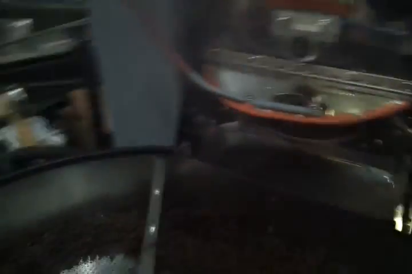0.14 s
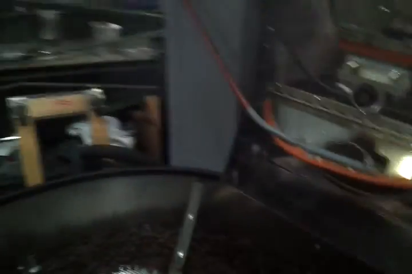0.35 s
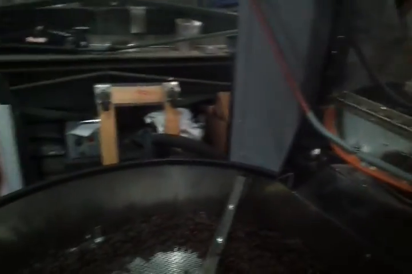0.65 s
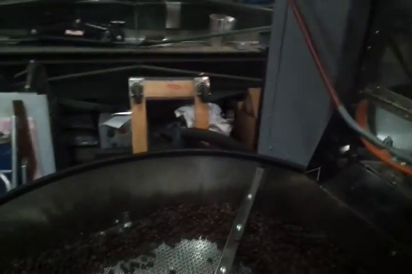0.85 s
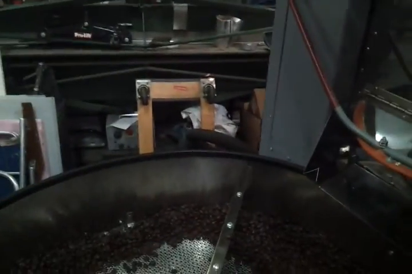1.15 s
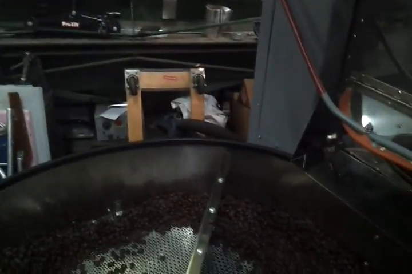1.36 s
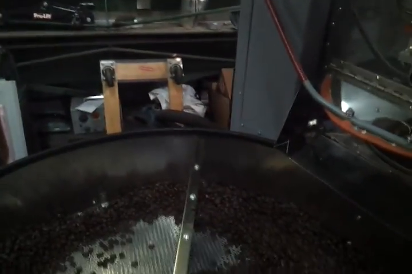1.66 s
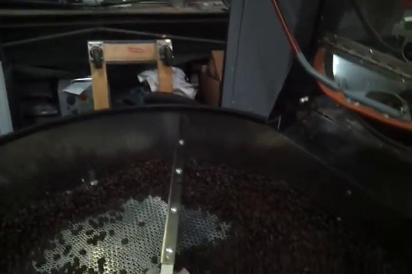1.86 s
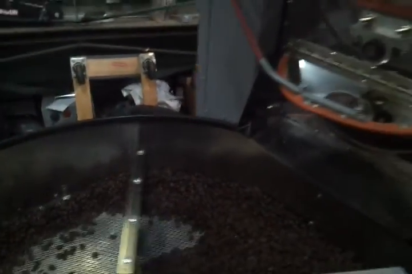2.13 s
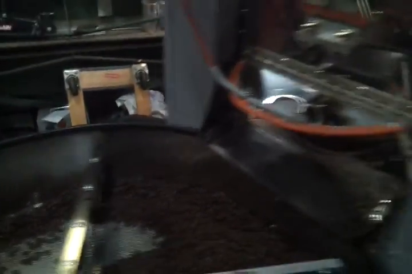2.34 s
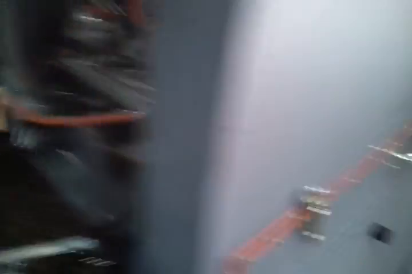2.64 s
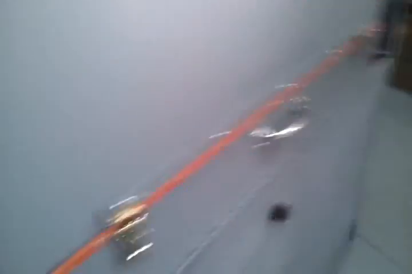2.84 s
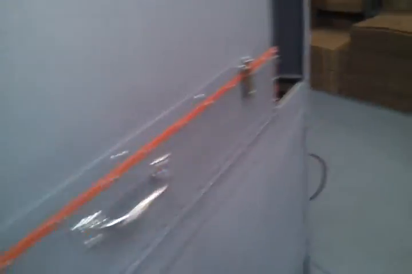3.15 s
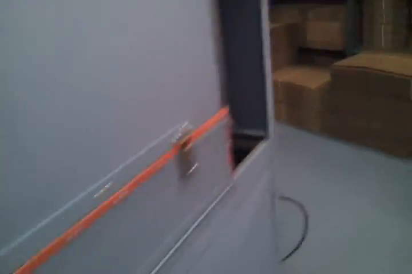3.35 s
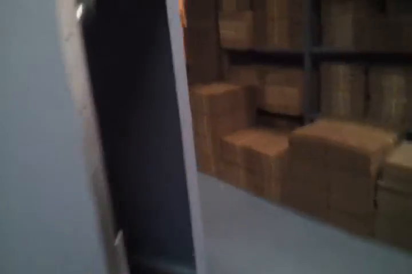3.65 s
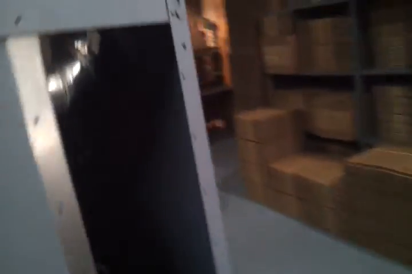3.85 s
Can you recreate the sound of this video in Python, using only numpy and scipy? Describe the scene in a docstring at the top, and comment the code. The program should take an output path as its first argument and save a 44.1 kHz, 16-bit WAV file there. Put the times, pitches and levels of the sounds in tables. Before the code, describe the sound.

Steady fan noise and motor hum, broken once by a sharp clack of metal.

```python
"""Workshop: a coffee roaster's cooling fan runs, with rushing air, a blade tone and motor hum.
Stirred beans swish faintly in the cooling tray. A metal part knocks lightly, then shuts with
one sharp clack that rings the panel; small handling taps come and go.
Near the end the microphone moves behind the cabinet, which shades the treble."""
import sys
import numpy as np
from scipy import signal
from scipy.fft import rfft, irfft
from scipy.io import wavfile
from scipy.ndimage import uniform_filter1d

SR = 44100
rng = np.random.default_rng(int(sys.argv[2]) if len(sys.argv) > 2 else 0)


def generate_wav(signal):
    """Clip the signal to [-1, 1] and save it as 16-bit WAV at the path in sys.argv[1]."""
    frames = np.transpose(np.atleast_2d(signal))
    scaled = np.clip(frames, -1, 1) * 32767
    pcm = np.round(scaled).astype(np.int16)
    wavfile.write(sys.argv[1], SR, pcm)


N = 176400
T = np.arange(N) / SR
HZ = np.fft.rfftfreq(N, 1 / SR)
TONE_FLUTTER_DB = 0.7

# microphone's path round the cabinet: t/s, air gain/dB, shade/0-1
MIC_PATH = [(0, 2, 0.09), (.6, -1, 0), (.95, -0.5, 0.01), (1.3, 3.2, 0.25), (1.75, 1.5, 0.17),
            (2.3, 1, 0.2), (2.6, -0.4, 0.1), (2.85, -1, 0.07), (3.05, -3.5, 0.24), (3.3, -3, 0.54),
            (3.55, -2.5, 0.74), (3.72, 0, 0.99), (4, -2.5, 0.95)]


def amp(db):
    """dB to gain."""
    return 10 ** (np.asarray(db) / 20)


def unit(x):
    """Scale to rms 1."""
    return x / np.sqrt(np.mean(x ** 2) + 1e-20)


def spectrum(points, hz):
    """Interpolate (f, value) rows over log frequency."""
    f, value = np.transpose(points)
    return np.interp(np.log(hz + 1), np.log(f), value)


def curves(rows, t):
    """Interpolate each column of a time table."""
    times, *columns = np.transpose(rows)
    return [np.interp(t, times, column) for column in columns]


def bell(hz, centre_hz, sigma_oct):
    """Gaussian band over log frequency, peak 1."""
    return np.exp(-(np.log2((hz + 1) / centre_hz) / sigma_oct) ** 2 / 2)


def noise(gain):
    """Noise shaped by a gain per bin, rms 1."""
    return unit(irfft(rfft(rng.standard_normal(N)) * gain, N))


def drift(rate_hz):
    """Slow random motion, rms 1."""
    return noise(np.exp(-(HZ / rate_hz) ** 2))


def decay(start_s, t60_s, rise_s=0.00097):
    """Quick attack, exponential release."""
    age = np.maximum(T - start_s, 0)
    return (1 - np.exp(-age / rise_s)) * np.exp(-np.log(1000) * age / t60_s)


def reflection_comb(hz, t, depth_db=2.5, width_hz=14, hold_s=0.18, corner_hz=370):
    """Random ripple in dB: reflections comb the air, shifting as the microphone moves."""
    delay_s = np.fft.fftfreq(len(hz), hz[1])[:, None]
    rate_hz = np.fft.fftfreq(len(t), t[1])
    smoothing = np.exp(-(delay_s * width_hz) ** 2 - (2 * rate_hz * hold_s) ** 2)
    ripple = np.fft.ifft2(np.fft.fft2(rng.standard_normal(smoothing.shape)) * smoothing).real
    return depth_db * unit(ripple) * (hz / (hz + corner_hz))[:, None]


def air(level_db=-33, flicker_db=0.68, patch_db=0.32):
    """Turbulent air through the duct's resonances, dulled behind the cabinet."""
    # rush beside the tray: f/Hz, relative density/dB
    rush_spectrum = [(25, -51), (60, -37.5), (95, -29), (140, -23.5), (190, -16.5), (320, -13),
                     (450, -14.5), (600, -10.5), (800, -12), (1200, -13), (1700, -11), (2500, -14),
                     (3300, -14.5), (5600, -14), (6400, -18.5), (7200, -26.5), (7600, -35), (7900, -59),
                     (8700, -44)]
    # duct and tray resonances: f/Hz, width/Hz, gain/dB
    resonances = [(320, 96, 2.5), (460, 100, -3), (548, 40, 5), (659, 70, -5.5), (861, 7.3, 7.5),
                  (1130, 98, 1), (1370, 85, 3.5), (1900, 580, 2.5), (2286, 150, -3), (3660, 340, -2),
                  (4370, 300, 2)]
    # cabinet's full shade: f/Hz, gain/dB
    full_shade = [(60, -2), (150, 1.5), (300, -6), (550, -10.5), (850, -7.5), (1400, -15), (2000, -15),
                  (2800, -11.5), (3800, -17), (5500, -17.5), (8000, -12.5)]
    # upper midrange while passing the cabinet: t/s, gain/dB
    presence = [(0, 0.5), (1.3, -.5), (2.2, -0.5), (2.5, 2), (2.8, 0), (3.0, 3.5), (3.25, 3.5), (3.55, 0.5),
                (3.78, -2.5), (4, 2.5)]
    frames = dict(fs=SR, nperseg=2048, noverlap=1536)
    hz, t, bins = signal.stft(rng.standard_normal(N), **frames)
    duct_db = sum(db / (1 + (2 * (hz - f) / width) ** 2) for f, width, db in resonances)
    colour = unit(amp(spectrum(rush_spectrum, hz) + duct_db))[:, None]
    path_db, shade = curves(MIC_PATH, t)
    shade_db = spectrum(full_shade, hz)[:, None] * shade
    presence_db = bell(hz, centre_hz=2260, sigma_oct=0.3)[:, None] * curves(presence, t)[0]
    patches = uniform_filter1d(rng.standard_normal(bins.shape), size=24, axis=0)
    patches = unit(uniform_filter1d(patches, size=7, axis=1))
    gain_db = path_db + presence_db + shade_db + patch_db * patches + reflection_comb(hz, t)
    rush = signal.istft(bins * colour * amp(gain_db), **frames)[1][:N]
    return rush * amp(level_db + flicker_db * drift(34))


def fan_blades(blade_hz=354.35, waver=0.0008, shaft_hz=17, throb_depth=0.1):
    """Blade-pass harmonics that throb with the shaft."""
    # tone at the microphone: t/s, rms level/dB of harmonics 1, 2, 4
    harmonics = [(0, -44, -48.5, -66), (.25, -46.5, -47.5, -66), (.53, -50.5, -39, -70),
                 (.8, -51.5, -39.5, -56), (1.15, -44.5, -41.5, -61), (1.7, -48.5, -41.5, -71),
                 (2.1, -50.5, -43.5, -64), (2.4, -48, -42, -67), (2.64, -51, -38.5, -54),
                 (2.7, -49, -42.5, -40.5), (2.78, -45, -41.5, -39), (2.83, -56, -43.5, -60),
                 (3.0, -49.5, -47.5, -68), (3.14, -42.5, -51.5, -70), (3.5, -44.5, -56.5, -73.5),
                 (3.62, -51, -49, -71), (3.72, -62, -65, -74), (4, -50, -53.5, -73)]
    phase = 2 * np.pi * np.cumsum(blade_hz * (1 + waver * drift(10))) / SR
    tone = sum(amp(db + TONE_FLUTTER_DB * drift(21)) * np.sin(k * phase)
               for k, db in zip((1, 2, 4), curves(harmonics, T)))
    throb = 1 + throb_depth * np.sin(2 * np.pi * shaft_hz * T)
    return np.sqrt(2) * tone * throb


def motor(hum_hz=119.9, whine_hz=980.4, whine_db=-51.5, shade_db=-12.5):
    """Low hum and a faint whine that the cabinet shades."""
    # motor hum: t/s, rms level/dB
    hum_level = [(0, -62.5), (2.6, -63.5), (2.95, -60.5), (4, -58.5)]
    hum = amp(curves(hum_level, T)[0]) * np.sin(2 * np.pi * hum_hz * T)
    shade = curves(MIC_PATH, T)[1]
    whine_gain = amp(whine_db + shade_db * shade + TONE_FLUTTER_DB * drift(4.5))
    return np.sqrt(2) * (hum + whine_gain * np.sin(2 * np.pi * whine_hz * T))


def beans(clicks_per_s=2500):
    """Clouds of tiny clicks as the stirring arm pushes beans over the tray."""
    # pushes: t/s, Gaussian sigma/s, level/dB
    swishes = [(0.186, 0.033, -35.5), (0.321, 0.0037, -30), (0.497, .02, -38), (0.674, 0.044, -38),
               (1.069, 0.02, -34), (1.22, 0.013, -41), (1.305, 0.01, -37), (2.19, .015, -39.5),
               (2.55, .012, -39), (2.84, 0.038, -41.5)]
    # bean clicks: f/Hz, relative density/dB
    click_spectrum = [(1000, -27), (3000, -10.5), (4500, -5.5), (5600, -2.5), (6800, -11.5), (8000, -35.5)]
    clicks = rng.standard_normal(N) * (rng.random(N) < clicks_per_s / SR)
    rattle = unit(irfft(rfft(clicks) * amp(spectrum(click_spectrum, HZ)), N))
    return rattle * sum(amp(db) * np.exp(-((T - t) / sigma) ** 2 / 2) for t, sigma, db in swishes)


def strike(contacts, colour_db, crack_db=-5.5, tail_db=-23):
    """Each contact cracks, then reverberates in the workshop."""
    # reverberation: f/Hz, t60/s
    room = [(200, .7), (500, 0.75), (1100, 0.32), (2200, 0.37), (4500, 0.26), (7500, 0.2)]

    def burst(t60_s, rise_s):
        power = sum((amp(db) * decay(t, t60_s, rise_s)) ** 2 for t, db in contacts)
        return rfft(rng.standard_normal(N) * np.sqrt(power))

    centres_hz, t60s = np.transpose(room)
    # equal-power crossfades between bands
    bands = [np.sqrt(spectrum(list(zip(centres_hz, share)), HZ)) for share in np.eye(len(room))]
    tail = sum(burst(t60, rise_s=0.0074) * band for t60, band in zip(t60s, bands))
    crack = burst(t60_s=0.022, rise_s=0.0004)
    return irfft((amp(crack_db) * crack + amp(tail_db) * tail) * unit(amp(colour_db)), N)


def metal_part(dull_db_per_oct=-4.5, dull_from_hz=1200, ring_db=-0.5):
    """Soft, dull knocks, then a clack whose hardest contact rings the panel."""
    # light knocks: t/s, relative level/dB
    knocks = [(.183, -23), (.196, -22), (.206, -20), (.2255, -16.5)]
    # contacts as the part shuts: t/s, relative level/dB
    clack = [(1.3926, -6), (1.3949, -0.5), (1.3993, 2), (1.4041, -10.5)]
    # metal contact: f/Hz, relative density/dB
    contact_spectrum = [(60, -36.5), (150, -22), (330, -6.5), (450, -11.5), (570, -2.5), (1150, 4),
                        (1500, -0.5), (2000, -6), (2800, -12), (4100, -1.5), (4800, -5), (5600, 1.5),
                        (6700, -9), (7400, -14.5), (7800, -32), (8600, -34.5)]
    # sheet metal modes: f/Hz, relative level/dB, t60/s
    panel_modes = [(423, -32, .9), (531.5, -26, .4), (790, -24, .2), (850, -25.5, .38), (1060.5, -22, .38),
                   (1105, -25, .18), (1241, -22, .22), (1351, -22, .22), (1510, -24, .19), (1771, -30, .3),
                   (1815, -29, .25), (3085, -29, .2), (3150, -26, .25), (3909, -28, .14), (4290, -29, .14),
                   (5243, -25, .12), (5615, -25, .14), (5801, -25, .14), (6485, -30, .13)]
    hard_db = spectrum(contact_spectrum, HZ)
    soft_db = hard_db + dull_db_per_oct * np.log2(np.maximum(HZ / dull_from_hz, 1))
    blow_s = max(clack, key=lambda row: row[1])[0]
    ring = sum(amp(db) * decay(blow_s, t60) * np.sin(2 * np.pi * (f * T + rng.random()))
               for f, db, t60 in panel_modes)
    return strike(knocks, soft_db) + strike(clack, hard_db) + amp(ring_db) * ring


def handling_taps():
    """Dull bumps and thin ticks: short bursts of band noise."""
    # taps: t/s, level/dB, f/Hz, sigma/oct, t60/s
    taps = [(.204, -29, 2600, .6, .04), (3.108, -41, 5400, .2, .03), (3.228, -50, 75, .6, .07),
            (3.4678, -28.5, 520, 1.2, .03), (3.607, -41, 5100, .2, .025), (3.6378, -28, 5900, .18, .006)]
    return sum(amp(db) * decay(t, t60) * noise(bell(HZ, f, sigma)) for t, db, f, sigma, t60 in taps)


def scene():
    """All sources at one microphone."""
    return (air() + fan_blades() + motor() + beans() + metal_part() + handling_taps())[None]


def record(dry, bass_cut_hz=55, edge_hz=8700, overload=0.55, squash=0.19, top_hz=16000):
    """Narrow-band microphone whose output squashes the clack's peaks."""
    def low_pass(x, hz):
        kernel = signal.firwin(255, hz, window=("kaiser", 8), fs=SR)
        return signal.oaconvolve(x, kernel[None], "same")

    bass_cut = signal.butter(1, bass_cut_hz, "highpass", fs=SR, output="sos")
    band = low_pass(signal.sosfilt(bass_cut, dry), edge_hz)
    excess = band - np.clip(band, -overload, overload)
    return low_pass(band - squash * excess, top_hz)


dry = scene()
out = record(dry)
generate_wav(out)
```